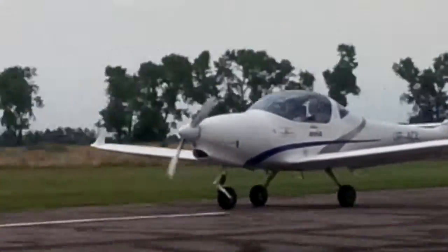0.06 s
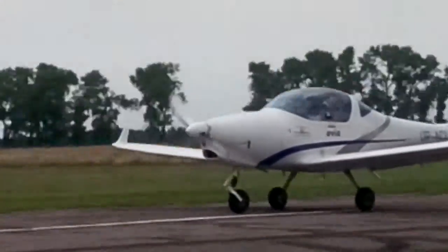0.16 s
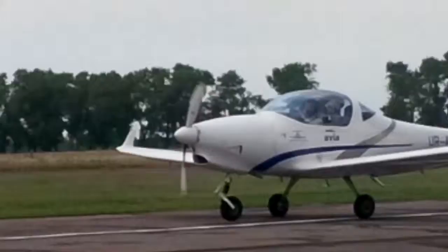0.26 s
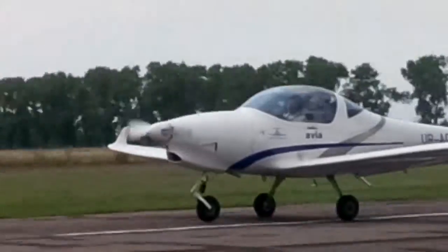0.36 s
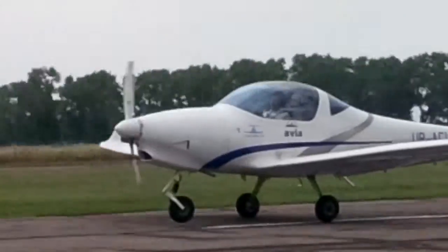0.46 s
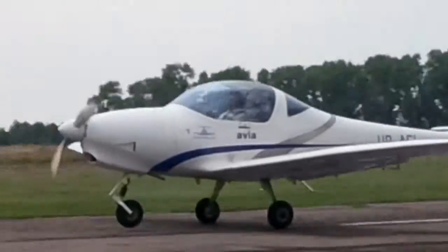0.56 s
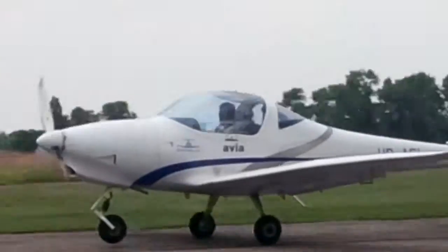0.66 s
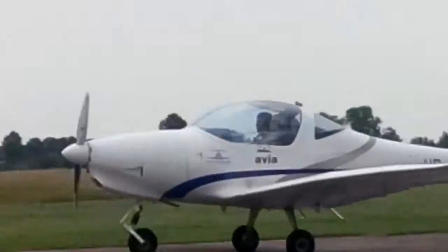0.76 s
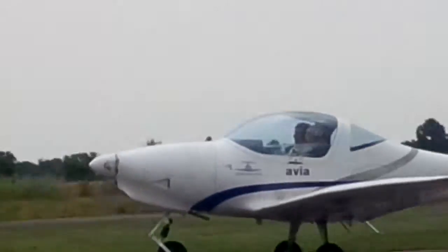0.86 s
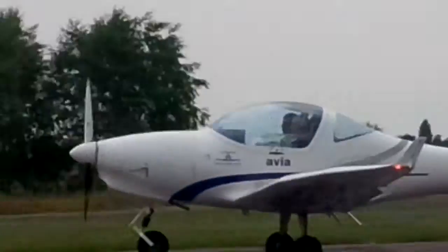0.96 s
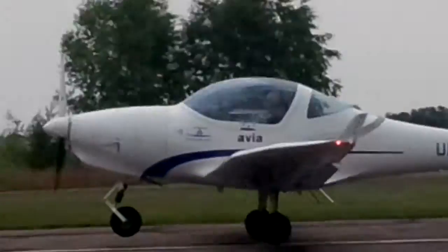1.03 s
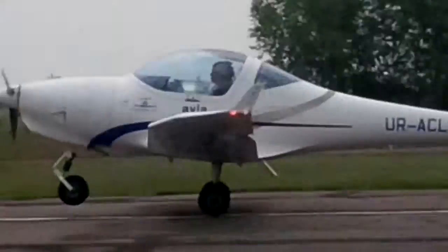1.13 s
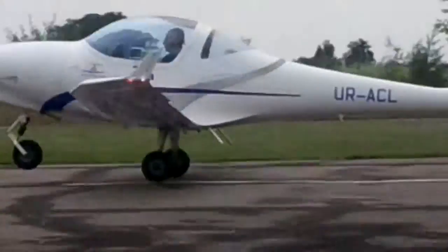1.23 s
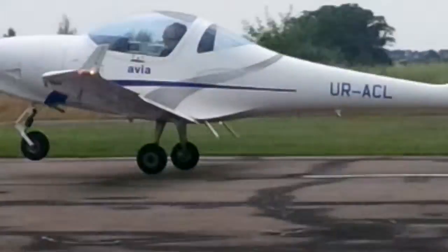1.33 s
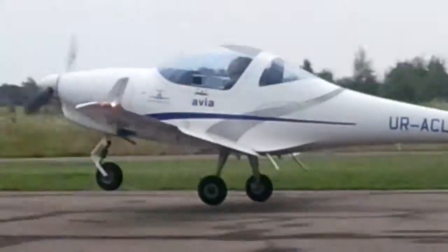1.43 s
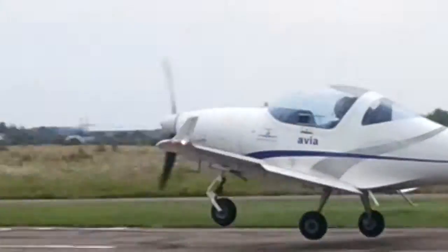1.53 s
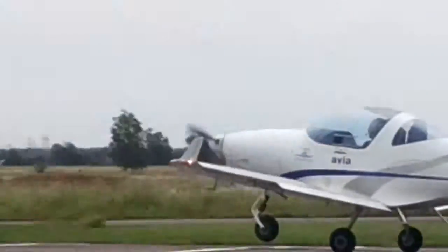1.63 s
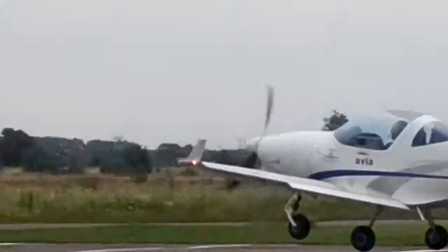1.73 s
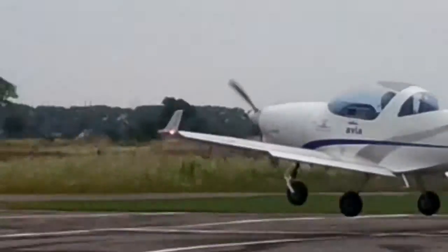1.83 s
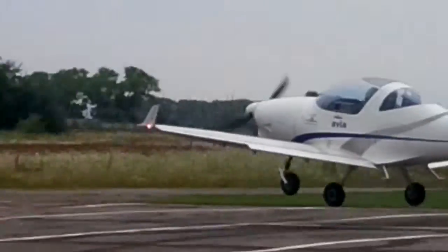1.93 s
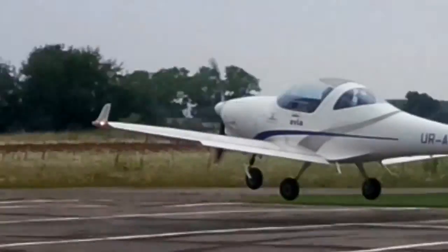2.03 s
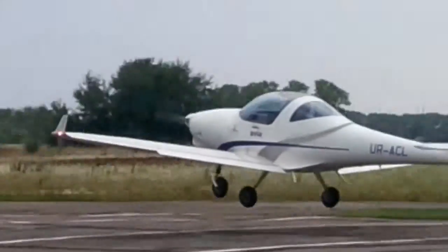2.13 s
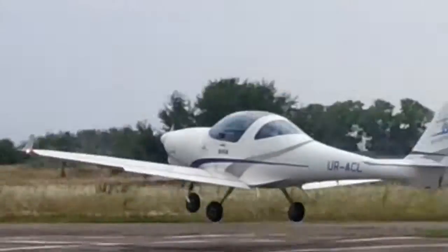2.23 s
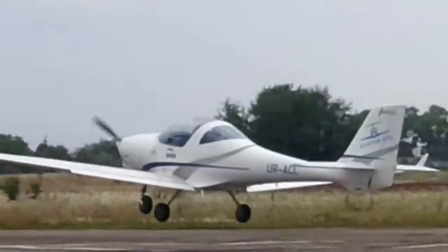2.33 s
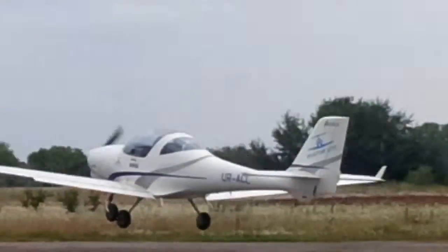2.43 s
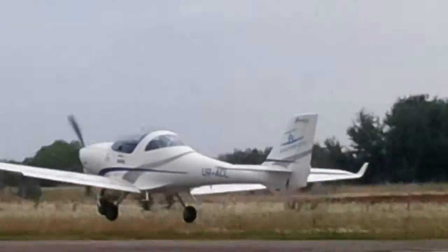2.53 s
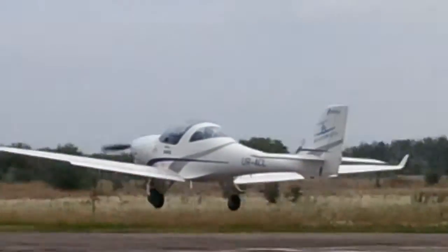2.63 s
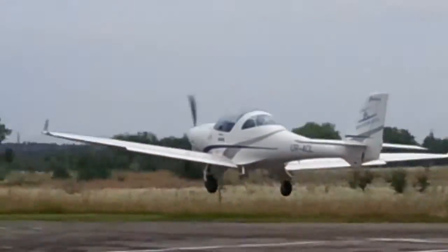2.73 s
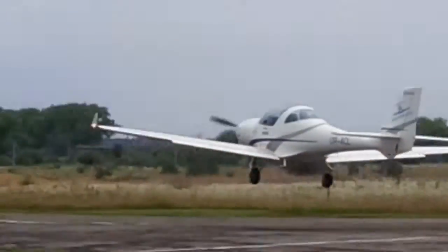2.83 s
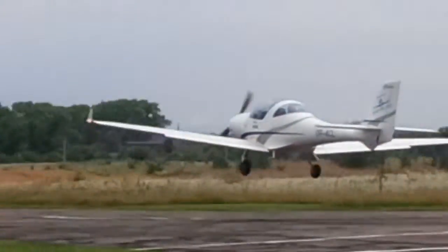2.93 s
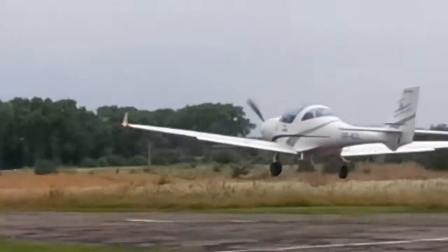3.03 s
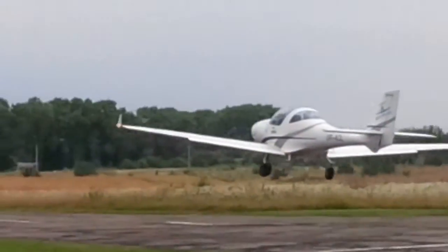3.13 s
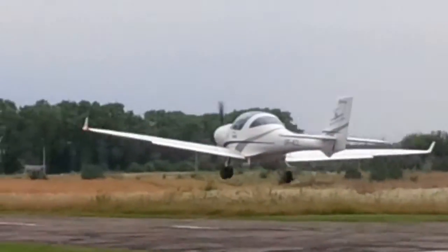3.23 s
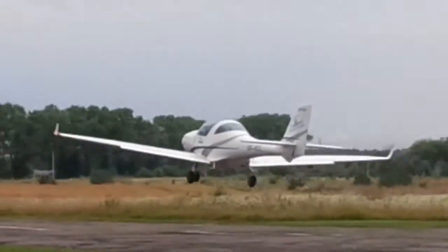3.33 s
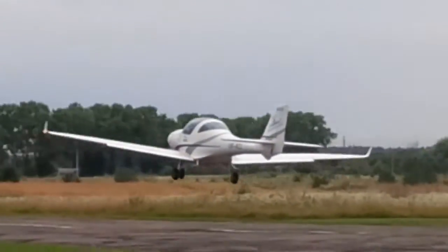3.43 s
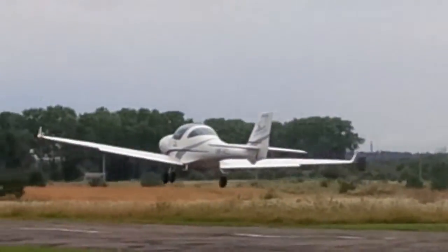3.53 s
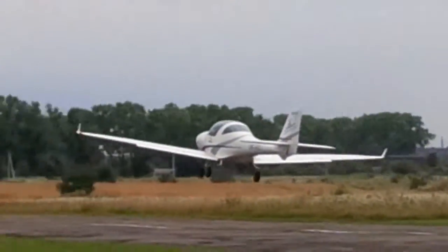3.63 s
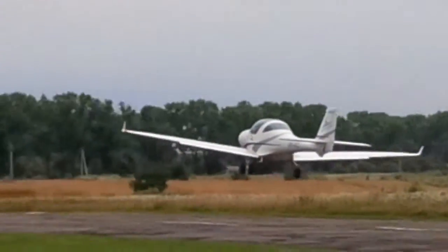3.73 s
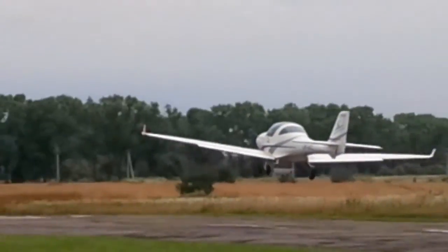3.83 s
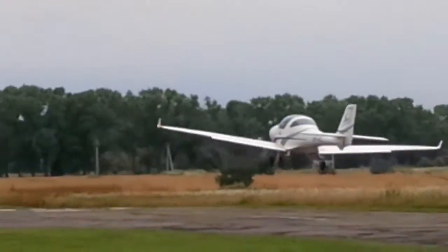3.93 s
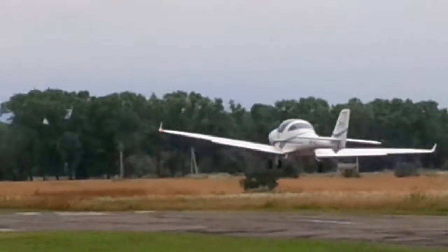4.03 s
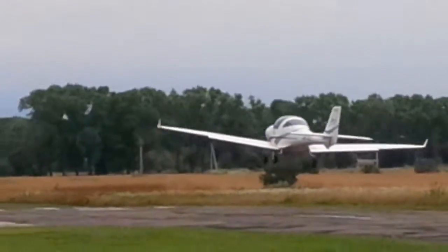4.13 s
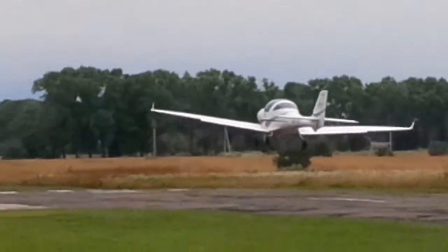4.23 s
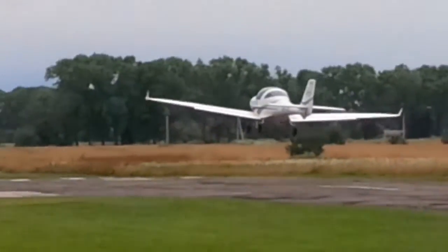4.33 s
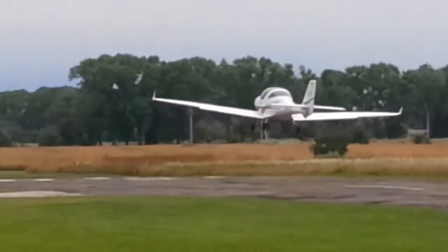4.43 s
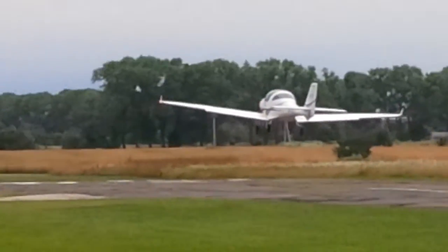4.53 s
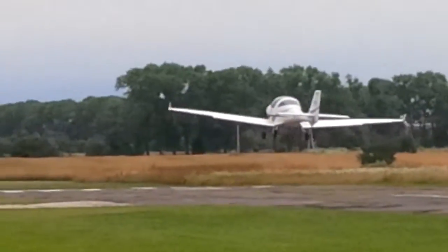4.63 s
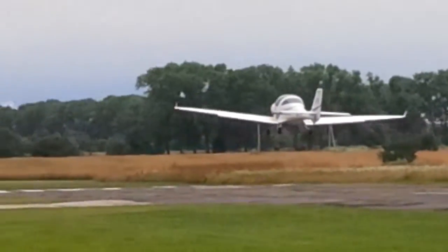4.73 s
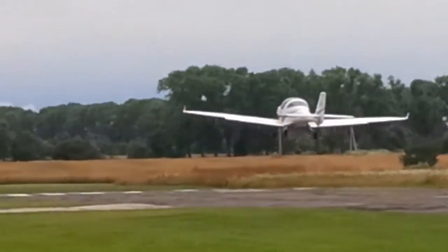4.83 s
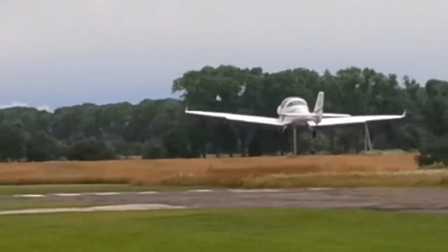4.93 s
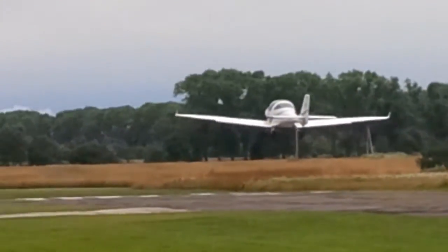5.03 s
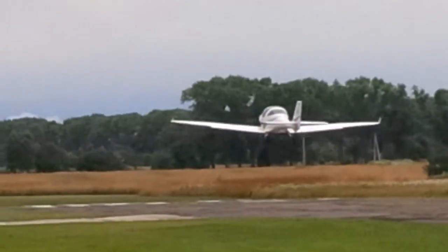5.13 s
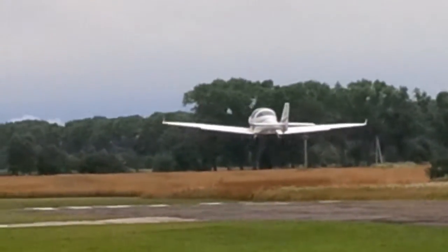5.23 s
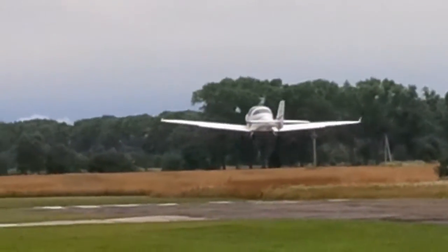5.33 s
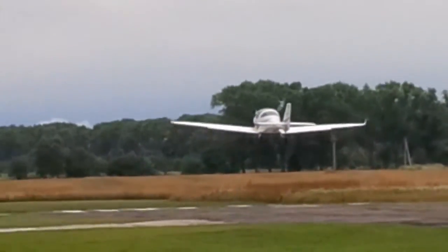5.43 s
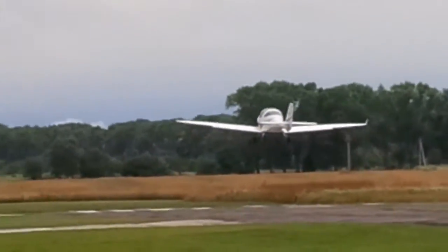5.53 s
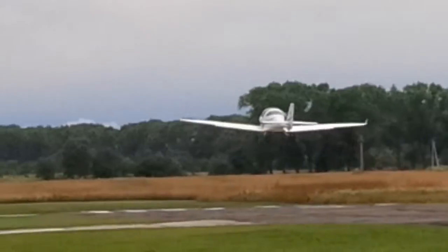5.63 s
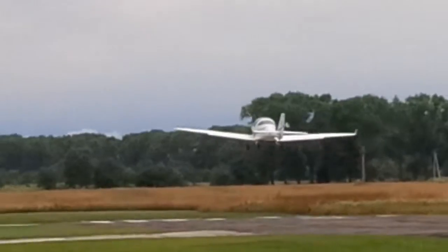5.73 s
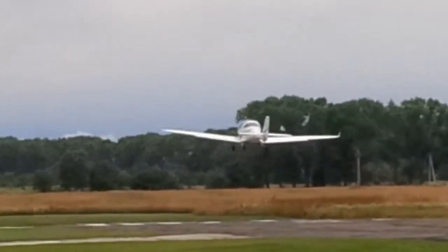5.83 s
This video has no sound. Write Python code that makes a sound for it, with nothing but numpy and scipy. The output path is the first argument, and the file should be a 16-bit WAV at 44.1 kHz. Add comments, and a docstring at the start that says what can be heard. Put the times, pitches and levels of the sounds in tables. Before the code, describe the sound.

A small propeller plane passes close at full takeoff power, dropping in pitch and fading as it climbs away over an open airfield.

```python
"""A light two-blade propeller plane comes along a flat airfield at full power. From the start, blade pulses,
a geared four-cylinder engine, rushing air and a thin whine sound over the hush of the field, partly echoed
by the ground. Two gusts of wind buffet the camera's two microphone ports. At about 1.2 s the plane passes
and its pitch falls; then it fades as it climbs away. From about 4.3 s the treble flares up in narrow bands
and the top hiss cuts out. Two soft taps land on the camera, and two weak gusts follow near the end."""
import sys
import numpy as np
from scipy import signal
from scipy.fft import rfft, irfft, next_fast_len
from scipy.io import wavfile
from scipy.ndimage import uniform_filter1d, map_coordinates

SR = 44100
rng = np.random.default_rng(int(sys.argv[2]) if len(sys.argv) > 2 else 0)


def unload_wav(signal):
    """Save mono or channel-first audio to the path in sys.argv[1] as 16-bit WAV at rate SR, clipped to [-1, 1]."""
    wavfile.write(
        sys.argv[1],
        SR,
        np.round(np.clip(np.atleast_2d(signal).T, -1, 1) * 32767).astype(np.int16),
    )


N = 258867
TIME = np.arange(N) / SR


def amp(db):
    """Turn decibels into a gain."""
    return 10 ** (np.asarray(db) / 20)


def unit(x):
    """Scale a signal to an average (rms) size of 1."""
    return x / np.sqrt(np.mean(x ** 2) + 1e-20)


def bell(x, centre, half_width):
    """A smooth hump: 1 at the centre, 0 far from it."""
    return np.exp(-((x - centre) / half_width) ** 2)


def over_pitch(points, hz):
    """Join (Hz, value) points along a logarithmic frequency axis."""
    freqs, values = np.transpose(points)
    return np.interp(np.log(hz + 1), np.log(freqs + 1), values)


def over_time(points):
    """Join (seconds, value) points into one value per sample."""
    return np.interp(TIME, *np.transpose(points))


def wobble(rate):
    """A smooth curve through `rate` random values a second."""
    return map_coordinates(rng.standard_normal(int(N * rate / SR) + 4), [TIME * rate])


def filtered(x, response):
    """Multiply each frequency in x by response(hz)."""
    size = next_fast_len(N + 8192)
    return irfft(rfft(x, size) * response(np.fft.rfftfreq(size, 1 / SR)), size)[..., :N]


def noise(spectrum, patchy_db, gate=1):
    """Two unrelated noises with the same loud and soft patches, pulsed by the gate and scaled to rms 1."""
    cells = signal.stft(rng.standard_normal((2, N)), nperseg=512)[2]
    patches = uniform_filter1d(rng.standard_normal(cells.shape[1:]), size=6, axis=0)
    patches = uniform_filter1d(patches, size=10, axis=1)
    pair = signal.istft(cells * amp(patchy_db * unit(patches)), nperseg=512)[1][:, :N]
    return unit(filtered(pair * gate, lambda hz: amp(over_pitch(spectrum, hz))))


def tone(turns, db, flutter_db, drift):
    """A sine wave whose level and phase are shaken by turbulent air."""
    shake = drift * wobble(14)
    return np.sqrt(2) * amp(db + flutter_db * wobble(11)) * np.cos(2 * np.pi * turns + shake)


# The plane passes in a straight line. BEARING is where the listener is, seen from the plane:
# 0 degrees is ahead of the nose, 180 is behind the tail.
CLOSEST_S, CLOSEST_M, SPEED_M_S, SOUND_M_S = 1.228, 35.84, 29.19, 343
PAST_M = SPEED_M_S * (TIME - CLOSEST_S)
DISTANCE_M = np.hypot(PAST_M, CLOSEST_M)
BEARING = np.degrees(np.arctan2(CLOSEST_M, -PAST_M))


def beam(db, deg, half_deg, fall_db, loss_db, lobe_deg=90, lobe_half_deg=10, lobe_db=0):
    """Level in dB over time of a sound that the plane sends mostly one way, weaker with distance."""
    # A beam row holds: level in dB at the closest distance, bearing and half width in degrees,
    # drop outside the beam in dB, extra loss in dB per 100 m. It may go on with a louder or
    # quieter side direction (a lobe): bearing and half width in degrees, change in dB.
    aimed_db = db - fall_db * (1 - bell(BEARING, deg, half_deg))
    aimed_db += lobe_db * bell(BEARING, lobe_deg, lobe_half_deg)
    spreading_db = 20 * np.log10(DISTANCE_M / CLOSEST_M)
    return aimed_db - spreading_db - loss_db * (DISTANCE_M - CLOSEST_M) / 100


def blade_count():
    """Blade passes heard so far: they arrive faster as the plane nears, slower as it leaves (Doppler)."""
    blade_hz = 75.94 - .084 * (TIME - CLOSEST_S)  # eases as the climb loads the engine
    leaving_m_s = SPEED_M_S * PAST_M / DISTANCE_M
    return np.cumsum(blade_hz / (1 + leaving_m_s / SOUND_M_S)) / SR


# The propeller's first four harmonics. Each row: a beam, as explained in beam().
PROPELLER_BEAMS = [(-11.5, 116, 34, 8, 14, 65.4, 6.7, -14), (-15, 99, 41.6, 20.5, 6.5, 60, 13, 6),
                   (-26.5, 89.4, 41.3, 10, 7.5, 75, 13, -2), (-19, 90, 26.6, 27, 0, 44, 18, 1)]

def propeller(blades):
    """Each blade sends a suction pulse with a steep front, so all harmonics share one phase shift."""
    levels = [beam(*row) for row in PROPELLER_BEAMS]
    levels += [levels[3] - 14, levels[3] - 22.5]  # harmonics 5 and 6 follow the fourth
    return sum(tone(k * blades + .36, db, flutter_db=0.7, drift=.05) for k, db in enumerate(levels, 1))


# The engine's strong harmonics 6, 4, 7, 8 and 12. Each row: a beam.
ENGINE_BEAMS = [(-21.5, 93.4, 18.8, 11.73, 1.63, 148.2, 21.6, 6.5), (-32, 44, 25, 3.4, 8.9, 102, 14, -18),
                (-22, 82, 18.3, 15.6, 4.7, 119, 3.5, -3), (-30, 79, 36, 19.1, 2.2, 153, 9.7, 8.5),
                (-25, 43.3, 45, 20.2, 10.3, 128, 11, -28)]
# Its weak harmonics. Each row: harmonic number, level in dB relative to the beam they share.
WEAK_HARMONICS = [(2, -22), (3, -18.5), (5, -16.5), (9, -35), (10, -60), (14, -26), (16, -21), (18, -29),
                  (20, -31), (24, -35), (29, -41), (33, -26), (37, -26)]
CYCLES_PER_BLADE = 51 / 84  # engine cycles per blade pass, through a 51:21 gear

def engine(blades):
    """Uneven exhaust pulses make many harmonics; the pipe favours a few, the ground echoes the weak."""
    def exhaust(harmonics):
        return sum(tone(k * CYCLES_PER_BLADE * blades + rng.random(), db, flutter_db=1.5, drift=0.4)
                   for k, db in harmonics)

    strong = exhaust(zip((6, 4, 7, 8, 12), [beam(*row) for row in ENGINE_BEAMS]))
    behind_wing_db = beam(-25, deg=118, half_deg=60, fall_db=2, loss_db=4)
    weak = exhaust((k, behind_wing_db + db) for k, db in WEAK_HARMONICS)
    return strong + with_ground_echo(weak[None])[0]


# How late the ground echo arrives. Each row: time in seconds, delay in milliseconds.
ECHO_DELAY = [(0, 1.62), (.45, 2.04), (1.3, 3.2), (2.4, 1.93), (3.2, 1.35), (3.6, 1.27), (5.87, 1.25)]

def with_ground_echo(x):
    """The direct sound plus its bounce off the runway: later, duller and slightly turned in phase."""
    gain = 0.61 * .5 ** ((DISTANCE_M - CLOSEST_M) / 59)  # halves every 59 m
    gain *= 1 - 0.42 * bell(BEARING, 95, 23)  # dips while the plane is alongside
    dull = filtered(x, lambda hz: np.exp(.2j * np.pi) / (1 + (hz / 4000) ** 2))
    sent_s = TIME - over_time(ECHO_DELAY) / 1000
    echo = np.array([np.interp(sent_s, TIME, channel) for channel in dull])
    return (x + gain * echo) / np.sqrt(1 + gain ** 2)


def blade_bursts(blades):
    """A gain that jumps up briefly, by an uneven amount, at each blade pass."""
    return amp(9 * (np.cos(2 * np.pi * blades - .3) - 1) + 2.5 * wobble(40))


# Where the rushing air is heard. Each row: a beam, for wash, roar, growl, swish and snaps in turn.
RUSH_BEAMS = [(-25.5, 49.2, 143, 8.6, 14.5, 111.6, 5.1, 4.5), (-28.5, 79.7, 74.4, 14.4, 1.6, 60, 10, 0),
              (-34, 104, 33.3, 11.6, 1, 53.7, 15, 10.5), (-32.5, 61.2, 56.7, 11.44, 0.61, 134, 7.1, 4.5),
              (-37.5, 44.5, 92, 12.8, 9, 104, 11.6, 4)]
# The colours of its six noises, low to high. Each row: frequency in Hz, relative level in dB.
WASH_SPECTRUM = [(30, -120), (55, -2), (120, -14.5), (250, -0.5), (340, -8.5), (400, -10.5), (520, -16),
                 (800, -120)]
GROWL_SPECTRUM = [(400, -120), (520, -4.5), (640, -2.5), (800, 0), (950, -0.5), (1100, -14.5), (1400, -120)]
ROAR_SPECTRUM = [(600, -120), (850, -3.5), (1050, -1.5), (1300, -0.5), (1650, 1), (1850, -7), (2000, -8.5),
                 (2500, -120)]
SWISH_SPECTRUM = [(1500, -120), (1900, -20), (2050, 1), (2400, 2), (2800, -4), (3300, -3.5), (4200, -9.5),
                  (5500, -14.5), (7500, -41), (10000, -120)]
SNAP_SPECTRUM = [(3000, -120), (3600, -6.5), (4200, -2.5), (5000, -2), (6000, -3), (7000, -3), (8000, -10),
                 (9500, -120)]
HISS_SPECTRUM = [(6000, -120), (7000, -8.5), (7700, -2), (8400, -3.5), (9200, -1), (10500, -1),
                 (11500, 1.5), (12600, -0.5), (14000, -3), (15700, -4.5), (16500, -6)]
# The hiss fades as the plane leaves, then this top treble cuts out abruptly at about 4.4 s.
# Each row: time in seconds, level in dB.
HISS_LEVEL = [(0, -36.5), (.1, -32.5), (.83, -35), (1.65, -39.5), (2.4, -43.5), (3.1, -49.5), (3.7, -56),
              (4.36, -64), (4.43, -78), (5.87, -79)]
# Brief swells and one dip in the treble. Each row: middle in seconds, change in dB, half length in seconds.
TREBLE_SWELLS = [(0.365, 0.5, 0.053), (0.616, 1, .06), (1.463, 2, 0.093), (2.038, 1.5, 0.052),
                 (3.69, 5.5, 0.065), (4.137, 7.5, 0.08), (4.342, -1, 0.045), (4.75, 11.5, 0.032),
                 (5.107, 4, .05), (5.257, 6, 0.06)]

def blade_rush(blades, bursts):
    """Turbulence on the blades; all but the low wash pulses as each blade swings towards the listener."""
    wash_db, roar_db, growl_db, swish_db, snap_db = [beam(*row) for row in RUSH_BEAMS]
    angle = 2 * np.pi * blades
    swing = np.cos(angle - .3) + .5 * np.cos(2 * angle - .9) + 1.3 * np.cos(3 * angle - 1.5)
    chop = amp(1.5 * bell(BEARING, 99.7, 37) * swing)  # deepest with the propeller seen edge-on
    wash = amp(wash_db + 1.2 * wobble(4.27)) * noise(WASH_SPECTRUM, patchy_db=0.5)
    roar = amp(roar_db + 0.37 * wobble(8)) * noise(ROAR_SPECTRUM, patchy_db=1, gate=chop)
    growl = amp(growl_db + 0.56 * wobble(7)) * noise(GROWL_SPECTRUM, patchy_db=2.5, gate=chop)
    swish = amp(swish_db + 1.3 * wobble(9)) * noise(SWISH_SPECTRUM, patchy_db=1, gate=chop)
    swell_db = sum(db * bell(TIME, middle, half) for middle, db, half in TREBLE_SWELLS)
    snap_db += 0.8 * swell_db + 0.5 * wobble(6.5)
    snaps = amp(snap_db) * noise(SNAP_SPECTRUM, patchy_db=1.5, gate=1.9 + bursts)
    hiss_db = over_time(HISS_LEVEL) + swell_db + 0.5 * wobble(5.17) + 0.18 * wobble(27.6)
    hiss = amp(hiss_db) * noise(HISS_SPECTRUM, patchy_db=1.5, gate=chop * (3.2 + bursts))
    return wash + roar + growl + swish + snaps + hiss


# Each row: a beam, for the first tone above the intake's pitch, the higher ones and the gear in turn.
WHINE_BEAMS = [(-35, 97, 22, 14.4, 4), (-36.5, 110, 35, 13.3, 5.5), (-45.5, 100, 50, 6, 3)]

def whine(blades):
    """Intake and gear tones, heard through the turning blades, split into tones one blade rate apart."""
    first_db, higher_db, gear_db = [beam(*row) for row in WHINE_BEAMS]
    below_db = beam(-40, deg=55, half_deg=40, fall_db=20, loss_db=15)
    intake, gear = 12 * CYCLES_PER_BLADE, 51 / 2  # vibrations per blade pass
    strongest = 2.7 + 6 * bell(BEARING, 78.4, 42)  # steps above the intake's pitch
    tones = [(intake + 1, first_db), (intake - 1, below_db)]
    tones += [(intake + n, higher_db - 1.2 * (n - strongest) ** 2) for n in range(2, 17)]
    tones += [(gear + n, gear_db - 1.2 * (n + 2) ** 2) for n in range(-4, 2)]
    in_step = blades - .05  # lines up with the blade swing
    return sum(tone(k * in_step, db, flutter_db=2, drift=.18) for k, db in tones)


# The colour of the field's hush. Each row: frequency in Hz, relative level in dB.
FIELD_SPECTRUM = [(240, -64), (400, -39), (576, -20), (637, -4), (734, 0.5), (1030, -1.5), (1620, -1.5),
                  (2260, -36), (2630, -15), (4500, -24.5), (5850, -53), (9900, -120)]

def field_hush():
    """The steady, quiet noise of the open field."""
    return amp(-48) * noise(FIELD_SPECTRUM, patchy_db=1)


# The colour of the wind. Each row: frequency in Hz, relative level in dB.
WIND_SPECTRUM = [(12, -120), (22, 4.5), (45, -1.5), (70, 3), (110, 2), (180, -3.5), (400, -17.5),
                 (700, -120)]
# The gusts. Each row: middle in seconds, level there in dB, half length in seconds.
WIND_GUSTS = [(0.112, -30, 0.091), (0.393, -24.5, 0.17), (5.448, -41.5, .05), (5.758, -42.5, .13)]

def wind():
    """Wind buffets both ports almost alike: lumpy gusts over a low rumble that follows the plane."""
    breeze = amp(beam(-36, deg=109, half_deg=55, fall_db=7, loss_db=8))
    gusts = sum(amp(db) * bell(TIME, middle, half) for middle, db, half in WIND_GUSTS)
    lumps = amp(0.83 * wobble(18))
    shared, side = (breeze + gusts) * lumps * noise(WIND_SPECTRUM, patchy_db=-0.5)
    return np.array([shared + .3 * side, shared - .3 * side])


# The treble flares. Each row: start and end in seconds, centre frequency in Hz, level in dB.
SNAP_FLARES = [(4.28, 4.98, 3750, -68), (4.62, 5.03, 5630, -63), (4.72, 4.83, 6600, -64),
               (5.06, 5.22, 7400, -67), (5.13, 5.4, 4860, -63), (5.28, 5.576, 5830, -63),
               (5.55, 5.69, 4670, -63.5), (5.654, 5.86, 5760, -69)]

def treble_flares(bursts):
    """Near the end, the blade snaps flare up briefly in narrow bands of treble."""
    snaps = unit((0.19 + bursts) * rng.standard_normal(N))
    out = np.zeros(N)
    for start, end, centre_hz, db in SNAP_FLARES:
        band = unit(filtered(snaps, lambda hz: bell(hz, centre_hz, half_width=350)))
        inside_s = np.minimum(TIME - start, end - TIME)
        out += amp(db) * band * np.clip(inside_s / .03 + .5, 0, 1)  # 30 ms fades
    return out


# The taps. Each row: start in seconds, level in dB before a 6.5 dB boost, pitch in Hz.
SOFT_TAPS = [(4.575, -34, 420), (5.226, -30, 360)]

def taps():
    """Each soft tap on the camera is a dull push that dies within a cycle or two."""
    out = np.zeros(N + SR)
    t = np.arange(SR // 20) / SR
    decay_db = 60 * t / 0.012
    for start, db, hz in SOFT_TAPS:
        out[round(start * SR):][:len(t)] += amp(db + 6.5 - decay_db) * np.sin(2 * np.pi * hz * t)
    return out[:N]


# How alike the air noise is left and right, before the bearing widens or narrows it.
# Each row: frequency in Hz, likeness (1 means the same).
STEREO_LIKENESS = [(60, 0.93), (300, 0.81), (1000, 1), (2000, 0.92), (4000, 0.94), (8500, 0.84),
                   (11000, 0.92), (13500, 0.66), (15700, 0.3)]

def scene():
    """Tones reach both ports alike; the air noise is partly unrelated, most of all in the top treble."""
    def mid_and_side_gains(hz):
        angle = np.arccos(np.clip(over_pitch(STEREO_LIKENESS, hz), -1, 1)) / 2
        return np.array([np.cos(angle), np.sin(angle)])

    blades = blade_count()
    bursts = blade_bursts(blades)
    air = blade_rush(blades, bursts)  # row 0 is shared by both ports (mid), row 1 sets them apart (side)
    air[0] += whine(blades)
    air = with_ground_echo(air)
    air[0] += treble_flares(bursts)
    mid, side = filtered(air + field_hush(), mid_and_side_gains)
    mid += propeller(blades) + engine(blades) + taps()
    side *= amp(-1.75 + 4.5 * bell(BEARING, 45, 25))  # widest as the plane approaches
    return np.array([mid + side, mid - side]) + wind()


# The ports' colours as the plane comes and as it goes. Each row: frequency in Hz, left minus right in dB.
COMING_COLOUR = [(75, -.3), (155, .5), (300, 0), (580, .5), (800, 0), (1000, 3), (1250, 7), (1750, 5),
                 (2150, -6), (2750, -1.5), (3200, -4.5), (5000, -1.5), (12000, -2), (15000, -.5)]
GOING_COLOUR = [(75, -.6), (150, 1), (300, 0), (550, 1), (800, .5), (1000, 2), (1300, 6.5), (1500, 6),
                (1750, 10), (2150, 3), (2600, -1), (3000, 1), (10000, -.5), (14000, 3)]
# The balance as the camera follows the plane. Each row: time in seconds, left minus right in dB.
BALANCE = [(0, -1.5), (.5, -1), (1.1, 1.8), (2.1, 1.8), (2.8, .6), (4.2, .3), (5.87, .6)]
# The housing's ripples in the treble. Each row: frequency in Hz, gain in dB.
HOUSING_RIPPLES = [(3100, 0), (3450, -4), (3800, 2.5), (4250, -2.5), (4800, 1), (5400, -1.5), (5800, 1.5),
                   (6300, -2.5), (6750, 1.5), (7600, -2), (8400, 2), (9200, -1.5), (10300, 1), (11000, 0)]

def record(dry):
    """The ports colour the sound by bearing, peaks clip softly, and the housing ripples the treble."""
    def left_right(lean_db):
        return amp(np.outer([.5, -.5], lean_db))

    coming = filtered(dry, lambda hz: left_right(over_pitch(COMING_COLOUR, hz)))
    going = filtered(dry, lambda hz: left_right(over_pitch(GOING_COLOUR, hz)))
    away = np.clip((BEARING - 62) / 58, 0, 1)  # blends over from 62 to 120 degrees
    ports = ((1 - away) * coming + away * going) * left_right(over_time(BALANCE))
    clipped = ports / (1 + np.abs(ports) ** 8) ** (1 / 8)
    top_cut_db = lambda hz: np.clip(hz - 15720, 0, None) / 2  # steep cut above 15720 Hz
    return filtered(clipped, lambda hz: amp(over_pitch(HOUSING_RIPPLES, hz) - top_cut_db(hz)))


dry = scene()
out = record(dry)
unload_wav(out)
```